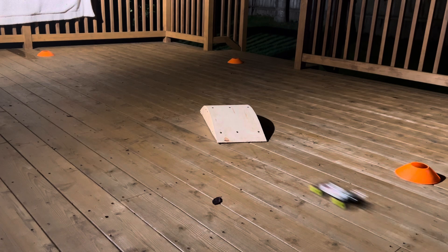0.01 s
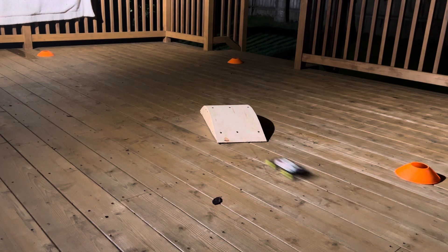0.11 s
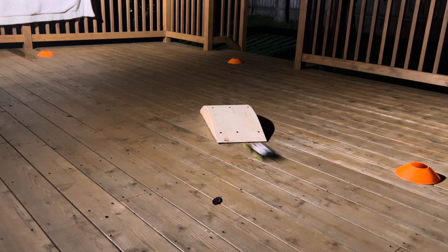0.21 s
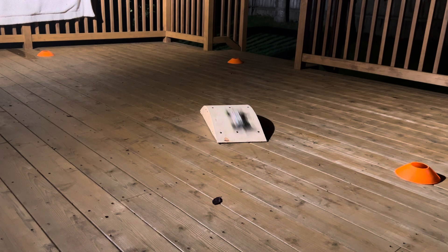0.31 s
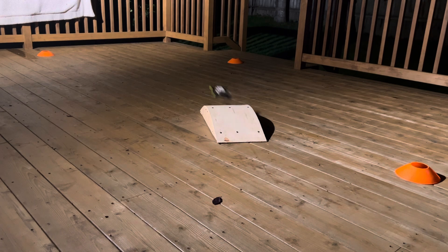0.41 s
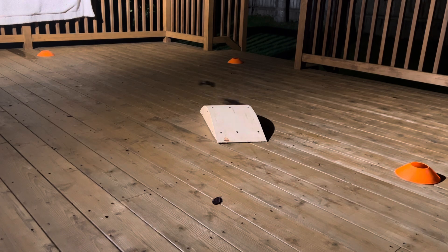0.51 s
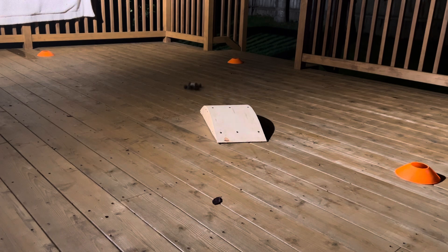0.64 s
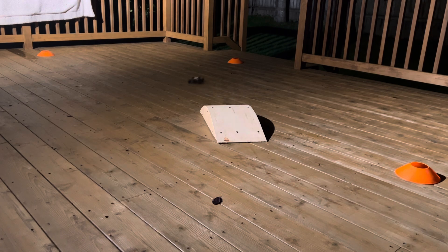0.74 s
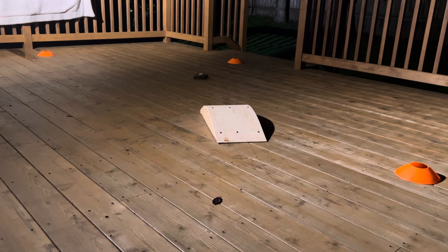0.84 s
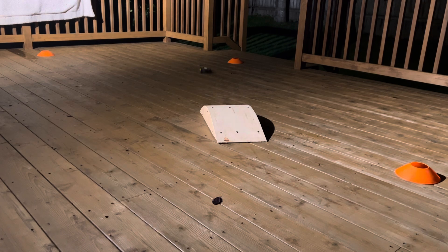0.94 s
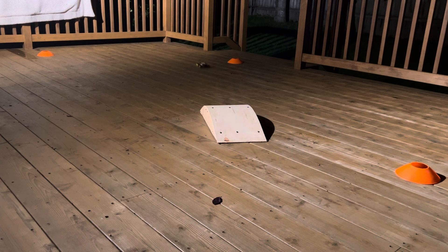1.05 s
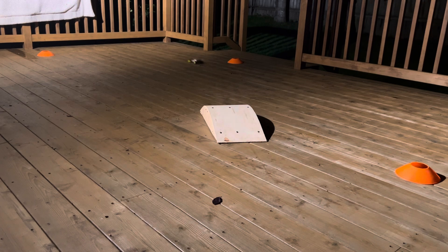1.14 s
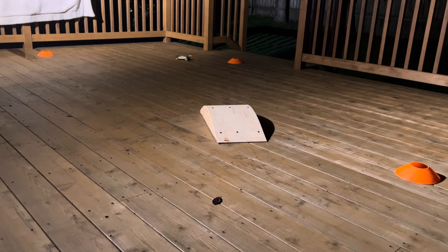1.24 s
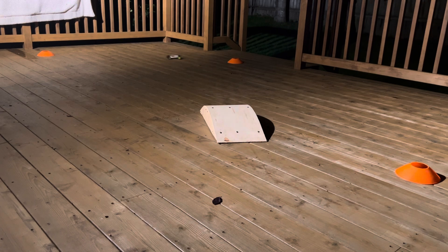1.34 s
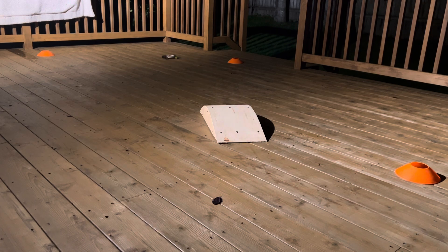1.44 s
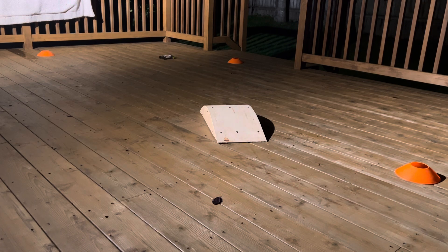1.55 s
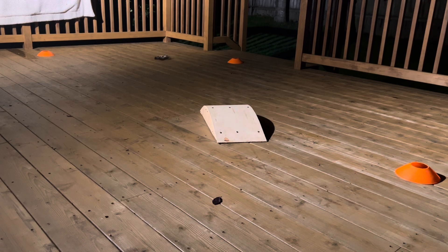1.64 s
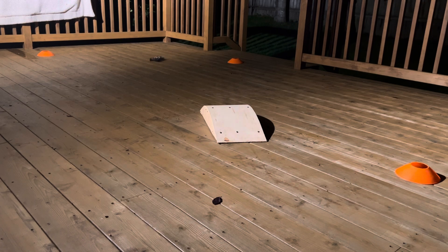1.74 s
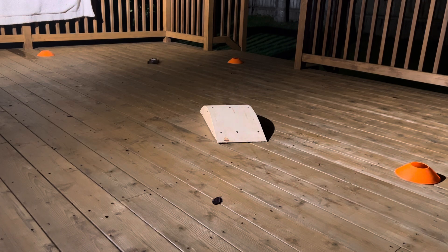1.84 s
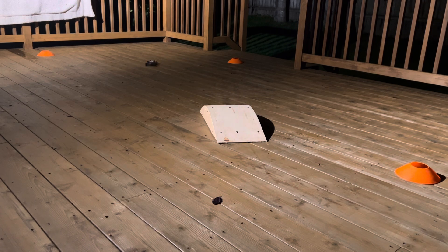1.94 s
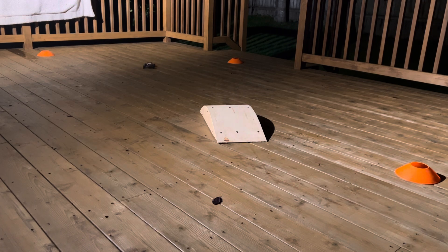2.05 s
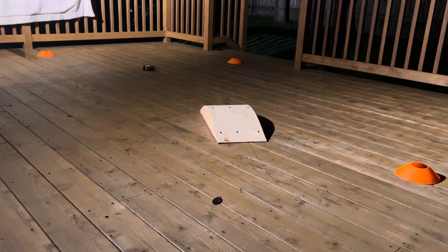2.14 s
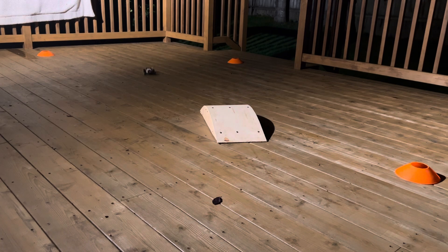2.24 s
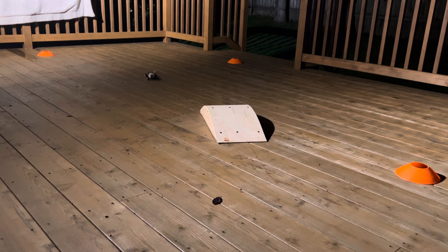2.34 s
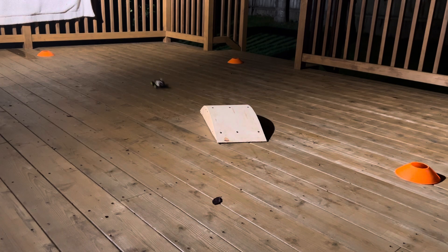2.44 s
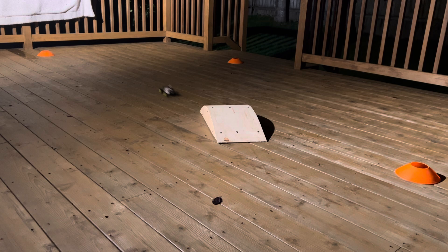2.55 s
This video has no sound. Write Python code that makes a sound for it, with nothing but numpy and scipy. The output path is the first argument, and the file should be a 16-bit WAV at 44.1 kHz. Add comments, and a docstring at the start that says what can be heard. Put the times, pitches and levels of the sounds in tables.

```python
"""A small electric toy buggy whines and rasps over a wooden deck outdoors at night, driving away and back.
It thumps up a board ramp, flies, lands on the planks and coasts almost to rest; a blip of throttle
brings a rough rising tone, a plastic clack, and it speeds back toward the two-port microphone.
Motor whine is a set of shaft orders, blows are decaying modes, and rasp, tyres and air are coloured noise.
The railing and wall answer with a short diffuse echo, and a low outdoor rumble lies under it all."""
import sys
import numpy as np
from scipy import signal
from scipy.fft import rfft, irfft, next_fast_len
from scipy.io import wavfile
from scipy.ndimage import map_coordinates

SR = 44100
rng = np.random.default_rng(int(sys.argv[2]) if len(sys.argv) > 2 else 0)


def transcribe(signal):
    """Save signal, clipped to [-1, 1], as a 16-bit WAV file at the path in sys.argv[1]."""
    frames = np.atleast_2d(signal).T
    limited = np.clip(frames, -1, 1)
    pcm = np.round(limited * 32767).astype(np.int16)
    wavfile.write(sys.argv[1], SR, pcm)


N = 114660  # samples, 2.6 s


def amp(db):
    """Decibels to gain."""
    return 10 ** (np.asarray(db) / 20)


def unit(x):
    """Scale to rms 1."""
    return x / np.sqrt(np.mean(x ** 2) + 1e-20)


def along(points, hz):
    """Interpolate (frequency, value) points on a log frequency axis."""
    point_hz, value = np.transpose(points)
    return np.interp(np.log(hz + 1), np.log(point_hz + 1), value)


def curves(rows):
    """One value per sample for each column after the time."""
    time_s, *columns = np.transpose(rows)
    return [np.interp(np.arange(N) / SR, time_s, column) for column in columns]


def wobble(rate):
    """A smooth random curve through normal knots, rate knots a second."""
    knots = rng.standard_normal(N // 8)
    return map_coordinates(knots, [np.arange(N) * rate / SR], mode="wrap")


def filtered(x, response):
    """Multiply the spectrum of x by a response of frequency."""
    size = next_fast_len(N + SR // 4)
    return irfft(rfft(x, size) * response(np.fft.rfftfreq(size, 1 / SR)), size)[..., :N]


def since(start_s):
    """Seconds after a moment, zero before it."""
    return np.maximum(np.arange(N) / SR - start_s, 0)


def strike(t, rise, t60):
    """Quick rise and exponential decay, 60 dB in t60 seconds."""
    return (1 - np.exp(-t / rise)) * np.exp(-np.log(1000) * t / t60)


def pair(mid, side):
    """Left and right from the middle and the side."""
    return np.array([mid + side, mid - side])


# likeness of left and right in the noises; columns: pitch_hz, likeness (0 unrelated, 1 identical)
LIKENESS = [(60, 1), (130, 0.77), (290, 0.71), (640, 0.008), (1400, 0), (2100, 1), (3000, 0.4),
            (5500, 0.14), (7000, 0.79)]


def rush(spectrum):
    """Coloured stereo noise whose middle has rms 1; the mix of middle and side sets the likeness."""
    def mid_side_response(hz):
        angle = np.arccos(np.clip(along(LIKENESS, hz), -1, 1)) / 2
        return amp(along(spectrum, hz)) * np.array([np.cos(angle), np.sin(angle)])

    mid, side = filtered(rng.standard_normal((2, N)), mid_side_response)
    return pair(mid, side) / mid.std()


# echo of the railing and wall around the deck; columns: pitch_hz, t60_s
RAILING_ECHO = [(100, 0.41), (500, 0.2), (2500, 0.16), (12000, 0.076)]


def echoed(x, wet_db):
    """The sound plus the diffuse answer of railing and wall: noise that decays at its own rate per pitch."""
    hz, t, noise = signal.stft(rng.standard_normal((2, SR // 2)), SR, nperseg=256)
    decay = np.exp(-np.log(1000) * t / along(RAILING_ECHO, hz)[:, None])
    tail = signal.istft(noise * decay, SR, nperseg=256)[1]
    tail = tail / np.linalg.norm(tail[0])
    return x + amp(wet_db) * signal.fftconvolve(x, tail, axes=1)[:, :N]


TURN_S, TURN_TIME_S = 1.2, 0.444  # middle and length of the turn to face the microphone


def facing():
    """Heading of the buggy: 0 driving away, 1 coming back."""
    return np.clip(.5 + (np.arange(N) / SR - TURN_S) / TURN_TIME_S, 0, 1)


# strength of the whine under load; columns: time_s, level_db
WHINE_LEVEL = [(0, -47), (.06, -49), (.11, -42.5), (.22, -44), (.32, -53.5), (.42, -69), (.58, -76),
               (.7, -68), (.78, -50), (.87, -54), (.95, -75), (1.15, -62.5), (1.35, -86), (1.56, -63),
               (1.61, -53), (1.66, -60), (1.76, -72), (1.93, -66), (2.06, -59), (2.16, -58.5), (2.26, -57),
               (2.4, -58), (2.6, -52.5)]
# partials of the whine, relative levels; columns: order (multiple of shaft speed), away_db, back_db
WHINE_ORDERS = [(1, -13, 7), (2, -1, -4), (3, -12, -4), (4, -4, -9), (5, -11, -9), (6, 0, -5), (8, 0, -15),
                (10, -6, -20), (12, -7, -20)]
# how the plastic body radiates the whine; columns: pitch_hz, gain_db
BODY_RESONANCE = [(300, -17), (850, -19), (1200, -6), (1430, -7), (1600, 0), (1880, -11), (2060, -2),
                  (2450, -9), (2660, -12), (2860, 1), (3130, -5), (3420, 0), (3900, -6), (4450, -4),
                  (5200, -8), (5900, -3), (6500, -4), (7400, -8), (8000, 2), (8500, -7), (15000, -8)]
WHINE_CLEAN, WHINE_BLUR_HZ = .8, 150  # steady share of each partial; random knots a second in the rest
FADE_DB, FADE_HZ = 2, 35  # random swell of each partial: rms of its knots, knots a second
DOPPLER, MIRROR_DB = .03, -7  # railing reflection: share of pitch shift, level
WHINE_WET_DB = 1


def whine(turns, speed):
    """Shaft orders, blurred by gear play, swell and fade as they glide through the resonances of the body.
    The railing ahead returns a sharper copy as the buggy nears it, a flatter one as it leaves."""
    level_db, = curves(WHINE_LEVEL)
    back = facing()
    mirrored_turns = np.cumsum(speed * (1 + DOPPLER * (1 - 2 * back))) / SR
    out = np.zeros(N)
    for order, away_db, back_db in WHINE_ORDERS:
        heading_db = away_db + back * (back_db - away_db)
        gain = amp(heading_db + along(BODY_RESONANCE, order * speed))
        for path_turns, path_db in ((turns, 0), (mirrored_turns, MIRROR_DB)):
            blur = (wobble(WHINE_BLUR_HZ) + 1j * wobble(WHINE_BLUR_HZ)) / np.sqrt(2)
            flutter = WHINE_CLEAN + np.sqrt(1 - WHINE_CLEAN ** 2) * blur
            flutter = flutter * amp(path_db + FADE_DB * wobble(FADE_HZ))
            out += gain * np.real(flutter * np.exp(2j * np.pi * order * path_turns))
    return echoed(out[None] * amp(level_db), WHINE_WET_DB)


# motor shaft speed before its small jitter; columns: time_s, speed_hz
SHAFT_SPEED = [(0, 570), (.05, 605), (.085, 722), (.12, 815), (.15, 888), (.185, 985), (.22, 1020),
               (.26, 1008), (.32, 1050), (.5, 1100), (.6, 1056), (.68, 660), (.755, 705), (.785, 732),
               (.81, 795), (.86, 835), (.92, 790), (1.1, 714), (1.52, 300), (1.575, 450), (1.605, 640),
               (1.64, 710), (1.72, 693), (1.8, 564), (1.97, 680), (2.06, 748), (2.15, 820), (2.2, 860),
               (2.24, 945), (2.32, 980), (2.38, 1050), (2.46, 1125), (2.51, 1165), (2.55, 1230),
               (2.6, 1340)]
# loudness of the drive in three successive runs, shared by rasp and hiss; columns: time_s, level_db
DRIVE_RUNS = [
    [(0.0, -54), (0.008, -47), (0.282, -41), (0.288, -42), (0.39, -47.5), (0.436, -54), (0.464, -51),
     (0.536, -58.5), (0.548, -54.5), (0.6, -55.5)],
    [(0.7, -55.5), (0.78, -48), (0.91, -50.5), (0.982, -57.5), (1.02, -54.5), (1.442, -81), (1.494, -99),
     (1.535, -66), (1.59, -56.5), (1.676, -52.5), (1.77, -62.5)],
    [(1.92, -62), (2.022, -58.5), (2.134, -56), (2.142, -53.5), (2.178, -56.5), (2.564, -52), (2.592, -47),
     (2.6, -51)],
]
# relative spectrum of the gear rasp; columns: pitch_hz, away_db (per Hz), back_db (per Hz)
GEAR_RASP = [(149, -2, -19), (500, -5, -7), (880, -0.5, -5.5), (1320, 4.5, 6.5), (1670, 4.5, 7),
             (1960, 1, 1), (2400, 0, -0.5), (2730, -2, -13), (2895, 5, 8.5), (3140, -2.5, -3), (3500, 5, 3),
             (3480, 1.5, -3), (4370, -0.5, 4.5), (5450, 0.5, -0.5), (6330, 2.5, -2), (9000, -3, 0),
             (11430, -1, -1.5), (13800, -4.5, -8)]
# relative spectrum of the brush hiss; columns: pitch_hz, density_db (per Hz)
BRUSH_HISS = [(7000, -35), (9500, 3.5), (11500, -4.5), (14000, -8.5), (15500, -14)]
RASP_DB, HISS_DB = 3, -5  # relative to the drive level
MESH_DEPTH, CHATTER_DB = 0.22, 0.82  # pulse depth as a share; rms of the random chatter knots
SPEED_JITTER = .008  # share of the shaft speed


def motor():
    """The whine, with gear rasp and brush hiss that pulse twice a turn."""
    speed = curves(SHAFT_SPEED)[0] * (1 + SPEED_JITTER * wobble(60))
    turns = np.cumsum(speed) / SR
    drive_db, = curves([row for run in DRIVE_RUNS for row in run])
    pulse = 1 + MESH_DEPTH * np.cos(4 * np.pi * turns)
    mesh = unit(pulse * amp(CHATTER_DB * wobble(350)))
    away = rush([(hz, away_db) for hz, away_db, _ in GEAR_RASP])
    back = rush([(hz, back_db) for hz, _, back_db in GEAR_RASP])
    rasp = np.sqrt(1 - facing()) * away + np.sqrt(facing()) * back
    noise = amp(RASP_DB) * rasp + amp(HISS_DB) * rush(BRUSH_HISS)
    return whine(turns, speed) + amp(drive_db) * mesh * noise


SPIN_UP_S, SPIN_UP_DB, SPIN_UP_RISE_S, SPIN_UP_T60_S = 1.584, -33.5, 0.023, .24
SPIN_UP_FROM_HZ, SPIN_UP_TO_HZ, SPIN_UP_GLIDE_S = 980, 1487, 0.022
SPIN_UP_BLUR_HZ = 400  # random knots a second


def spin_up():
    """A rough tone glides up from about 1 to 1.5 kHz as the motor spins up, blurred apart in each channel."""
    t = since(SPIN_UP_S)
    hz = SPIN_UP_TO_HZ + (SPIN_UP_FROM_HZ - SPIN_UP_TO_HZ) * np.exp(-t / SPIN_UP_GLIDE_S)
    rough = np.array([wobble(SPIN_UP_BLUR_HZ) + 1j * wobble(SPIN_UP_BLUR_HZ) for _ in range(2)])
    tone = np.real(rough * np.exp(2j * np.pi * np.cumsum(hz) / SR))
    return amp(SPIN_UP_DB) * strike(t, SPIN_UP_RISE_S, SPIN_UP_T60_S) * tone


# loudness of the tyres on the planks; columns: time_s, level_db
ROLL_LEVEL = [(0, -65), (.22, -58), (.33, -85), (.42, -53), (.6, -75), (.68, -36.5), (.76, -48.5),
              (.85, -57.5), (.92, -46), (1.0, -49.5), (1.1, -49.5), (1.17, -53), (1.26, -58), (1.38, -63),
              (1.5, -72), (1.62, -65.5), (1.78, -60), (1.92, -59.5), (2.05, -65), (2.3, -60.5), (2.56, -63),
              (2.6, -52)]
# relative spectrum of the tyre rumble; columns: pitch_hz, density_db (per Hz)
TYRE_RUMBLE = [(60, -2), (130, 3), (220, -7), (330, 1.5), (480, -5), (700, -6), (1100, -11), (1500, -5),
               (2000, -17), (3000, -19), (6000, -71)]


def tyres(bumps_db=2.2):
    """Uneven rumble of the wheels over the planks: noise with a randomly bumpy level."""
    bumps = unit(amp(bumps_db * wobble(70)))
    return amp(curves(ROLL_LEVEL)[0]) * bumps * rush(TYRE_RUMBLE)


# relative spectrum of the crack of a blow on wood; columns: pitch_hz, density_db (per Hz)
WOOD_CRACK = [(25, -52), (80, -32), (200, -8.5), (400, 8), (700, 2), (1100, -5), (1600, -8), (2100, -17.5),
              (3500, -31), (7000, -32), (14000, -48)]
CRACK_RISE_S, CRACK_T60_S, KNOCK_WET_DB = .0007, .045, -15


def knocks(hits, modes):
    """Each blow rings the wood and adds a crack; a longer contact leaves the high modes quiet."""
    ring, crack_power = np.zeros((2, N)), np.zeros(N)
    for start_s, ring_db, crack_db, contact_s in hits:
        t = since(start_s)
        crack_power += (amp(crack_db) * strike(t, CRACK_RISE_S, CRACK_T60_S)) ** 2
        for hz, mode_db, t60_s, pan_db in modes:
            chance_db = rng.normal(0, 1)
            gain = amp(ring_db + mode_db + chance_db) / (1 + (hz * contact_s) ** 2)
            tone = gain * strike(t, contact_s, t60_s) * np.sin(2 * np.pi * hz * t)
            ring += amp([[pan_db / 2], [-pan_db / 2]]) * tone
    return echoed(ring + np.sqrt(crack_power) * rush(WOOD_CRACK), KNOCK_WET_DB)


# wheels and chassis strike the ramp; columns: start_s, ring_db, crack_db, contact_s
RAMP_BLOWS = [(.238, -28.5, -24.5, 0.00046), (.2438, -19, -20.5, 0.00088), (.2555, -13.5, -26, .0015),
              (.2735, -20, -18, 0.00081), (.2808, -13, -20, 0.0012), (.2905, -19, -20, 0.00089),
              (.328, -32, -50, .0033), (.352, -34.5, -52, 0.0013)]
# modes of the ramp board, relative levels; columns: pitch_hz, level_db, t60_s, left_right_db
RAMP_MODES = [(127.4, -14.5, 0.13, 0), (149, -13, 0.13, -4), (284.6, -23, 0.26, 0), (325.9, -5, 0.24, -5.5),
              (359.2, 1, 0.14, 1.5), (388, -0.5, 0.11, 1), (442, -5, .1, 8), (460, -24, 0.11, -5),
              (553.4, 0.5, 0.076, 3.5), (849.4, -4.5, 0.11, 2), (1011, -6, 0.07, -4), (1060, -8, 0.072, -3),
              (1526, -8.5, 0.078, -6)]
# the empty ramp hums on after the jump
HUM_S, HUM_HZ, HUM_DB, HUM_RISE_S, HUM_T60_S = 0.32, 326.5, -38.5, 0.054, 0.78
HUM_DRIFT_RAD = .5  # rms of the random phase knots


def ramp():
    """The board thumps under the wheels, then hums on faintly and unevenly."""
    t = since(HUM_S)
    phase = 2 * np.pi * HUM_HZ * t + HUM_DRIFT_RAD * wobble(23)
    hum_gain = amp(HUM_DB + 2.9 * wobble(23.5))
    hum = hum_gain * strike(t, HUM_RISE_S, HUM_T60_S) * np.sin(phase)
    return knocks(RAMP_BLOWS, RAMP_MODES) + hum


# the buggy bumps, lands and bounces on the deck; columns: start_s, ring_db, crack_db, contact_s
DECK_BLOWS = [(.063, -72, -46, .0005), (.611, -63, -37.5, 0.00075), (.6145, -19, -44, 0.0026),
              (.635, -30, -26, .0014), (.6437, -18, -18, 0.00075), (.6488, -24.5, -17, 0.00027),
              (.6565, -31.5, -20.5, 0.00029), (.666, -42, -27, .0005), (.676, -42, -39, .0007)]
# modes of the deck planks, relative levels; columns: pitch_hz, level_db, t60_s, left_right_db
DECK_MODES = [(128.5, -11, 0.12, 1.5), (199, -28, 0.16, -7), (257.6, -7.5, 0.18, -10.5),
              (269, -13, 0.44, -4), (395, -0.5, 0.078, 1), (608, -4, 0.051, 10), (682, -2.5, 0.057, -3),
              (916, -10, 0.12, -14), (1437, -0.5, 0.062, -10), (1730, -9.5, 0.091, 11)]
# the joists boom under the jump and the landing; columns: start_s, level_db
JOIST_BOOMS = [(.3, -39), (.645, -33)]
# relative spectrum of the joist boom; columns: pitch_hz, density_db (per Hz)
JOIST_SPECTRUM = [(20, -28), (40, 2.5), (65, 2.5), (110, -6), (180, -17.5), (280, 5.5), (400, -33),
                  (800, -50)]
BOOM_RISE_S, BOOM_T60_S = 0.029, .55


def landing():
    """The planks ring under the bouncing buggy; the joists boom after the jump and the landing."""
    boom = sum(amp(level_db) * strike(since(start_s), BOOM_RISE_S, BOOM_T60_S)
               for start_s, level_db in JOIST_BOOMS)
    return knocks(DECK_BLOWS, DECK_MODES) + boom * rush(JOIST_SPECTRUM)


# bright clacks: the sharp snap of the ramp and landing blows, then the plastic body clacking and rattling;
# columns: start_s, level_db, t60_s
CLACKS = [(0.274, -32.5, 0.051), (0.609, -44, 0.13), (.636, -35.5, 0.028), (.6437, -36, 0.025),
          (0.655, -40.5, 0.044), (1.7844, -30.5, 0.022), (1.789, -41, 0.017), (1.805, -40.5, 0.032),
          (1.8217, -42.5, 0.041), (1.836, -46, 0.052), (1.847, -53, .06), (1.862, -51, 0.12),
          (2.141, -43.5, 0.025), (2.585, -46, .053)]
# relative spectrum of the clacks; columns: pitch_hz, density_db (per Hz)
CLACK_SPECTRUM = [(300, -21.5), (1600, -12.5), (2100, 3.5), (2700, 7), (3400, -1), (4200, 1.5),
                  (5300, 3.5), (6700, -6.5), (8000, -4), (14000, -6.5)]
CLACK_RISE_S, CLACK_WET_DB = .0003, -4


def clacks():
    """Short bright noise bursts: the snap of the harder blows on wood, and the clacks of the plastic body."""
    bursts = sum(amp(level_db) * strike(since(start_s), CLACK_RISE_S, t60_s)
                 for start_s, level_db, t60_s in CLACKS)
    return echoed(bursts * rush(CLACK_SPECTRUM), CLACK_WET_DB)


# relative spectrum of the outdoor background; columns: pitch_hz, density_db (per Hz)
NIGHT_AIR = [(20, -29), (45, -1.5), (65, 4.5), (105, -2), (160, -7.5), (300, -16), (1000, -19.5),
             (3000, -28), (8000, -51.5), (15000, -39)]


def night_air(level_db=-55.5):
    """Steady coloured noise, heaviest in the bass, as the outdoor rumble."""
    return amp(level_db) * rush(NIGHT_AIR)


def scene():
    """The buggy, its blows and the night air."""
    return motor() + spin_up() + tyres() + ramp() + landing() + clacks() + night_air()


# the microphone narrows its treble; columns: pitch_hz, side_db
PORT_NARROWING = [(5800, -1), (6700, -5), (9000, -22), (14000, -18)]
# phase between the two ports; columns: pitch_hz, phase_rad
PORT_TURN = [(6800, 0), (8500, 1.4), (9850, 3.14), (11100, 4.6), (12300, 6), (13500, 6.4), (14500, 7.7),
             (15300, 9.3)]
# balance between the two ports; columns: pitch_hz, left_right_db
PORT_LEVELS = [(100, 1.5), (300, -0.2), (700, 1), (1300, -0.5), (2400, 1.4), (4500, 3.5), (7000, 0.5)]
# tone shaping of the middle: deep dip near 10 kHz, softer top; columns: pitch_hz, middle_db
MIDDLE_TONE = [(8900, 0), (9450, -35), (10250, -35), (10750, 0), (14500, 0), (15200, -20)]


def record(dry, low_cut_hz=40, top_hz=15500):
    """The microphone narrows and phase-shifts treble between its ports, and cuts deep bass and the top;
    the tone of the middle is shaped last."""
    half = np.array([[.5], [-.5]])  # each port takes half the difference, with opposite sign

    def ports(hz):
        balance = amp(half * along(PORT_LEVELS, hz))
        turn = np.exp(1j * half * along(PORT_TURN, hz))
        low_cut = hz / (hz - 1j * low_cut_hz)
        return balance * turn * low_cut * (hz < top_hz)

    mid, side = pair(*dry) / 2
    narrow = pair(mid, filtered(side, lambda hz: amp(along(PORT_NARROWING, hz))))
    mid, side = pair(*filtered(narrow, ports)) / 2
    return pair(filtered(mid, lambda hz: amp(along(MIDDLE_TONE, hz))), side)


dry = scene()
out = record(dry)
transcribe(out)
```